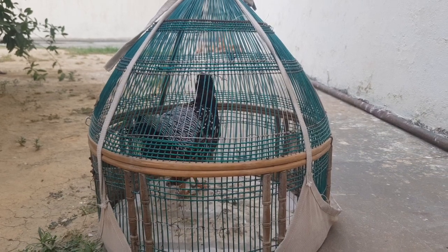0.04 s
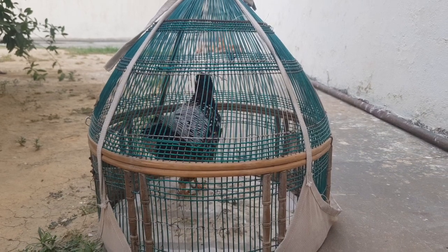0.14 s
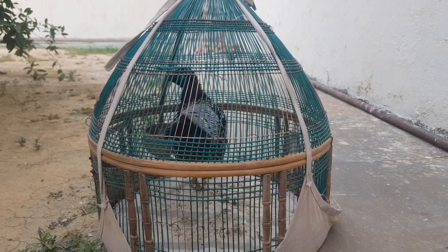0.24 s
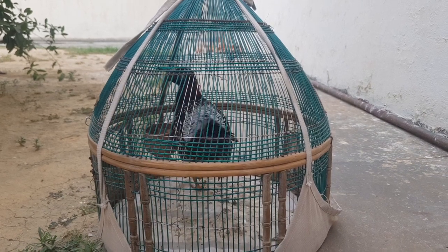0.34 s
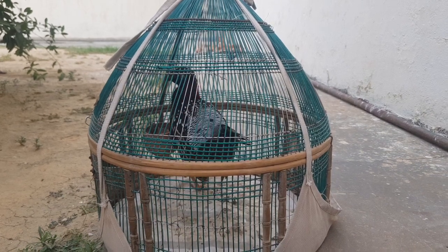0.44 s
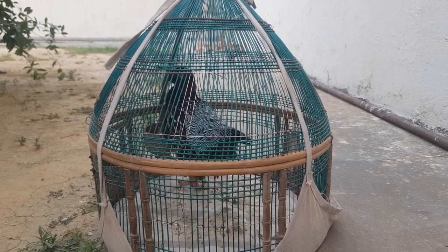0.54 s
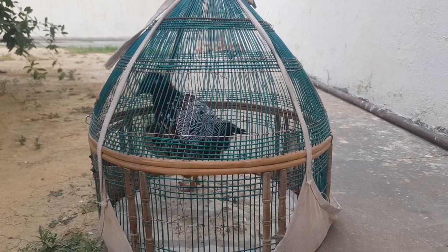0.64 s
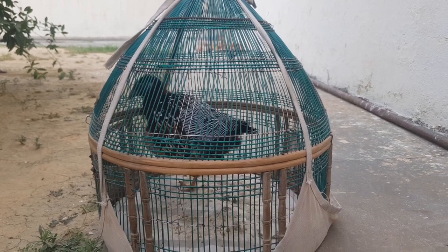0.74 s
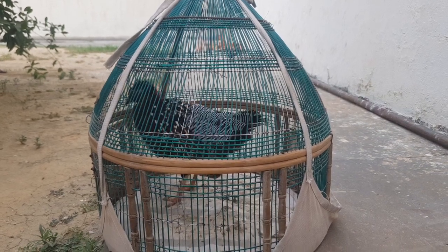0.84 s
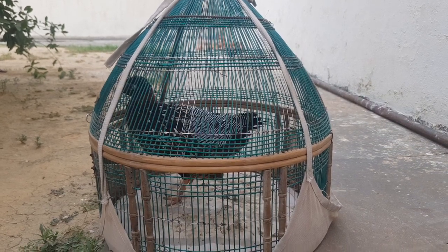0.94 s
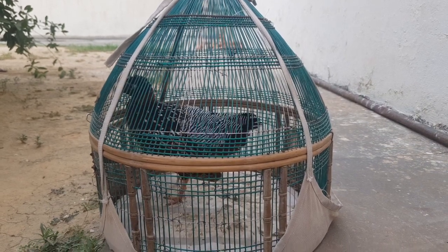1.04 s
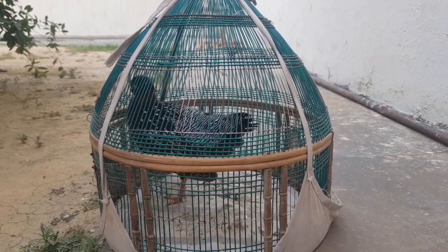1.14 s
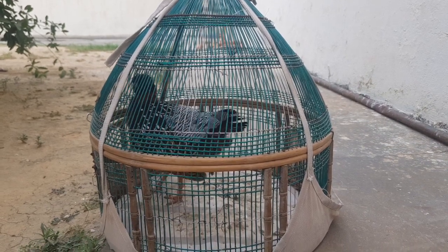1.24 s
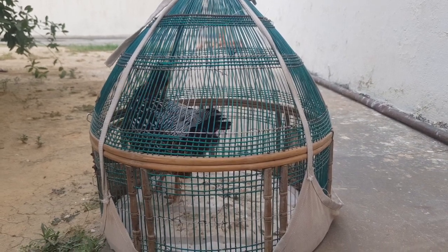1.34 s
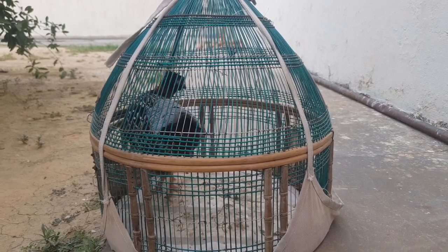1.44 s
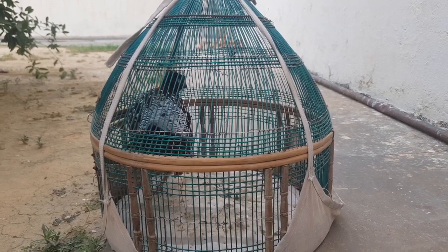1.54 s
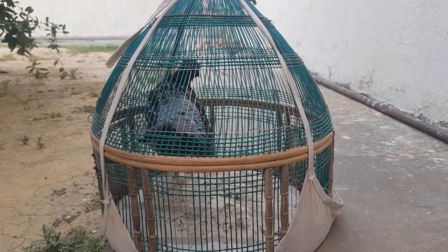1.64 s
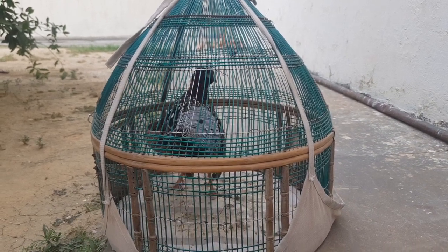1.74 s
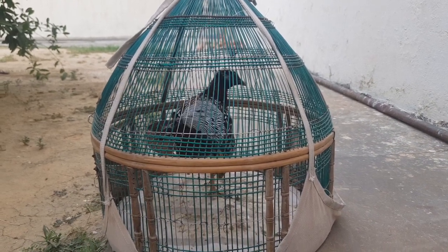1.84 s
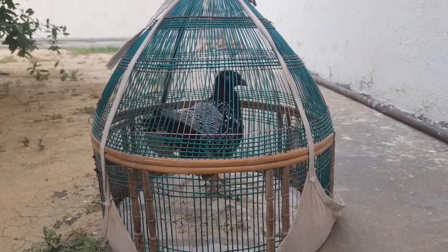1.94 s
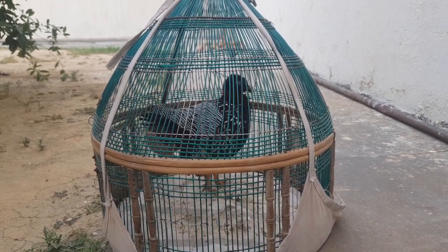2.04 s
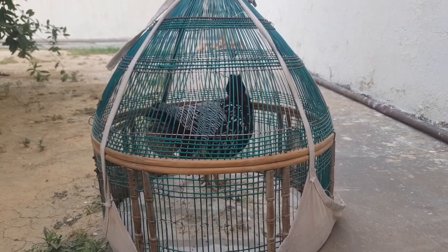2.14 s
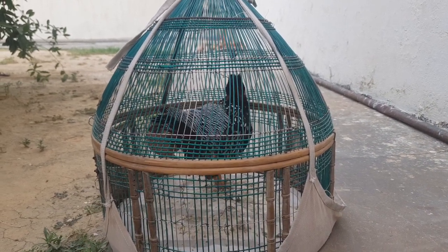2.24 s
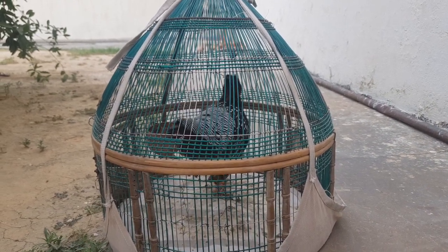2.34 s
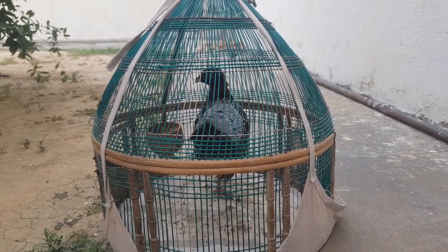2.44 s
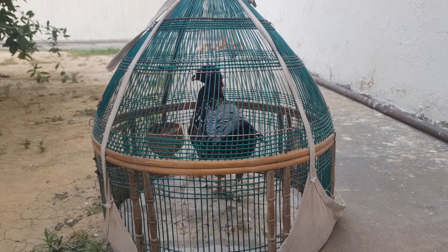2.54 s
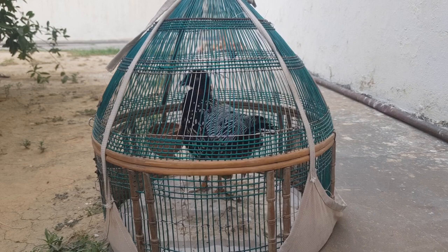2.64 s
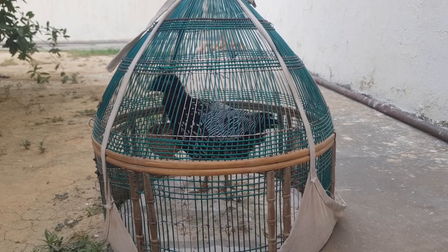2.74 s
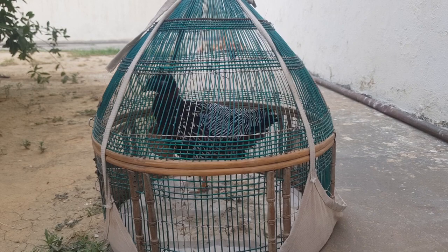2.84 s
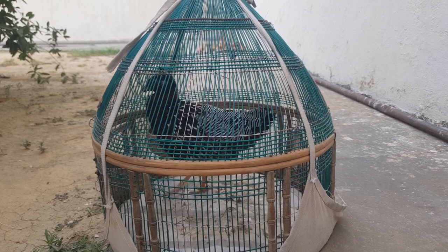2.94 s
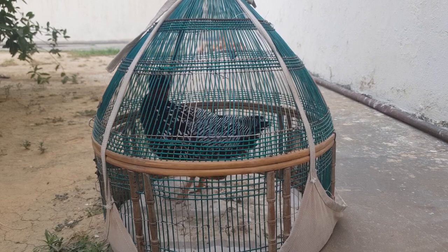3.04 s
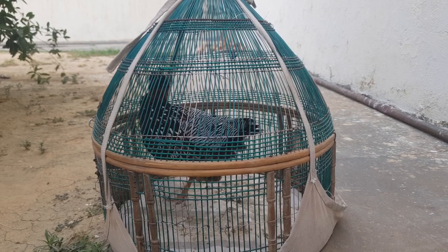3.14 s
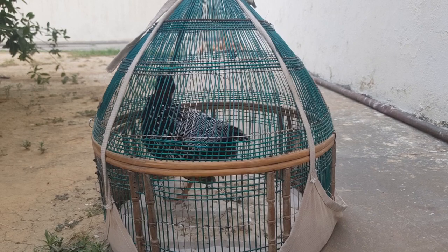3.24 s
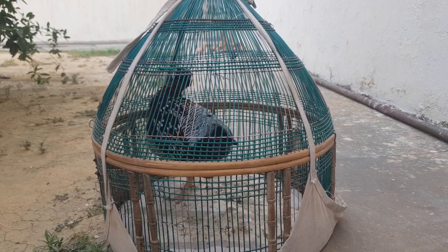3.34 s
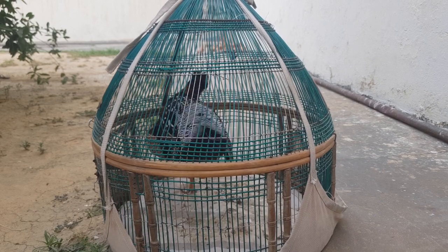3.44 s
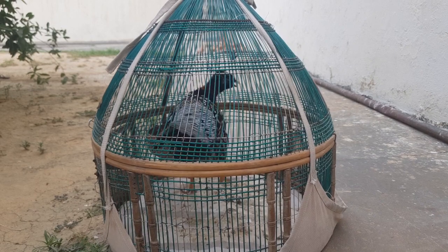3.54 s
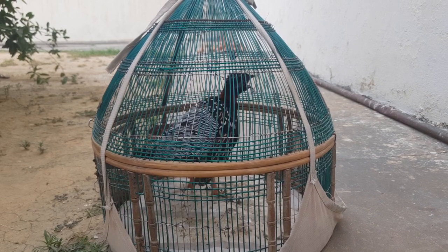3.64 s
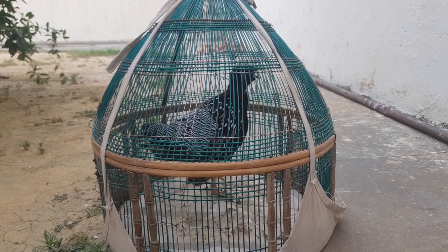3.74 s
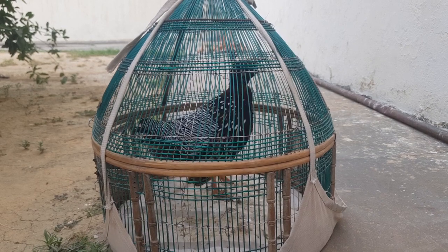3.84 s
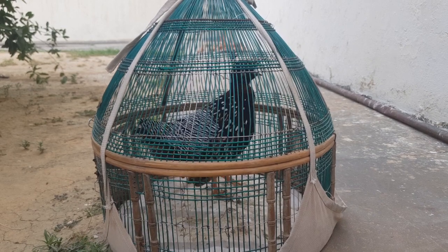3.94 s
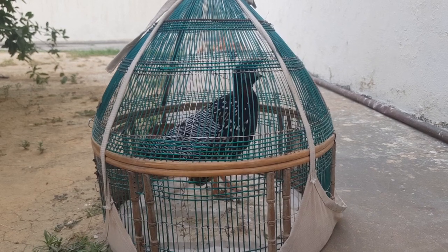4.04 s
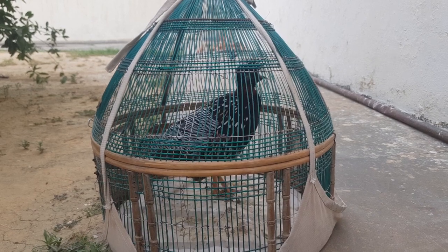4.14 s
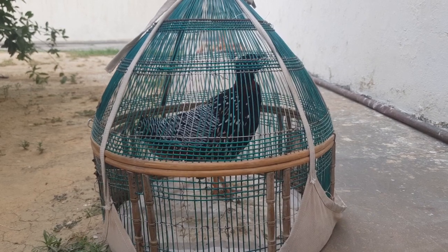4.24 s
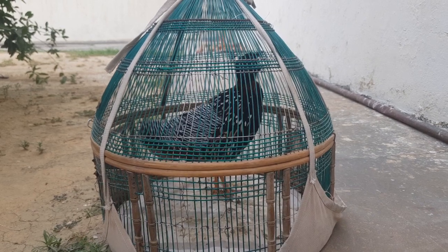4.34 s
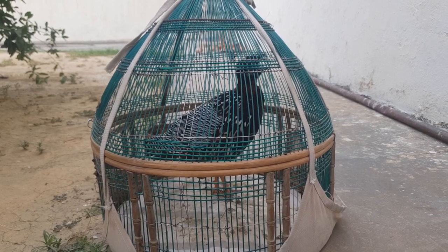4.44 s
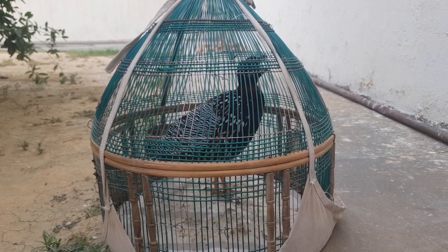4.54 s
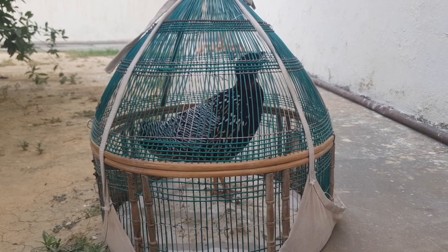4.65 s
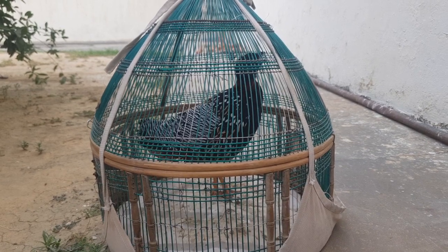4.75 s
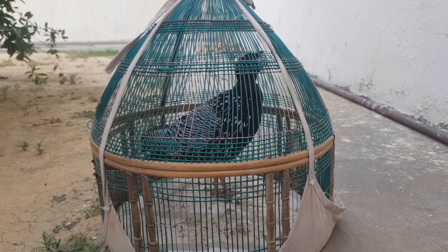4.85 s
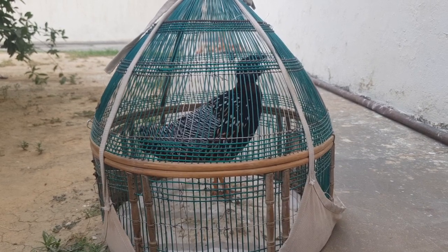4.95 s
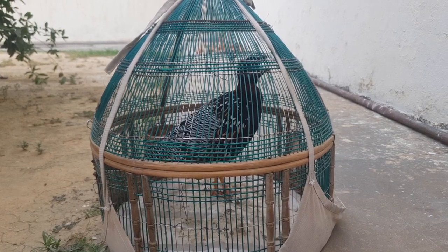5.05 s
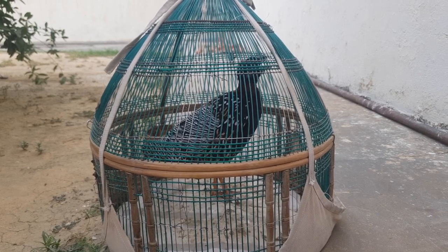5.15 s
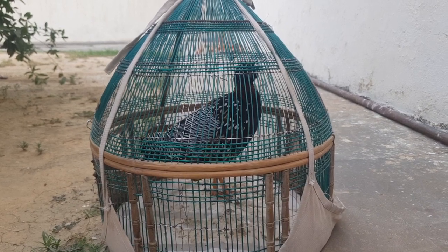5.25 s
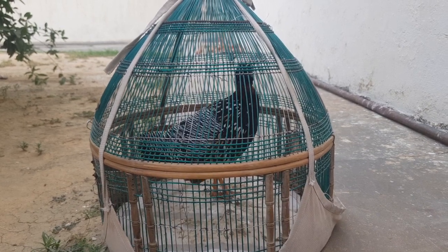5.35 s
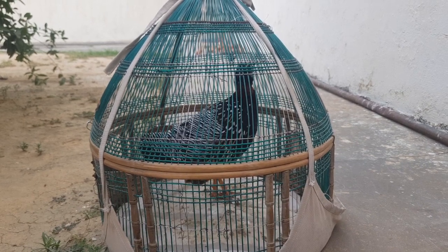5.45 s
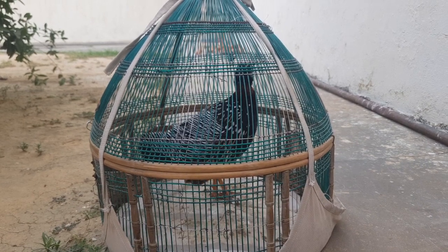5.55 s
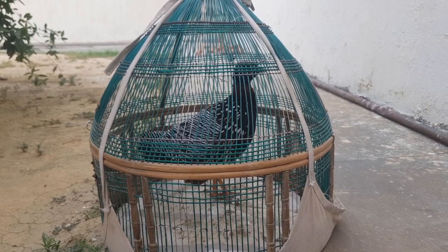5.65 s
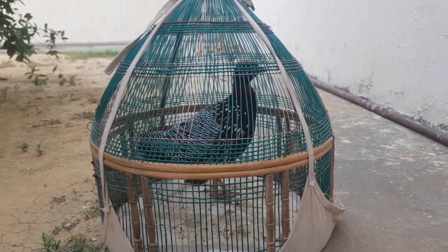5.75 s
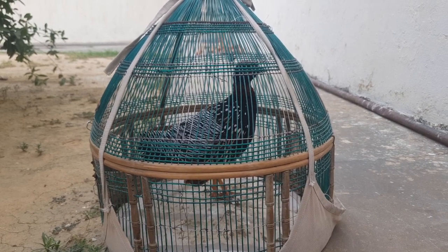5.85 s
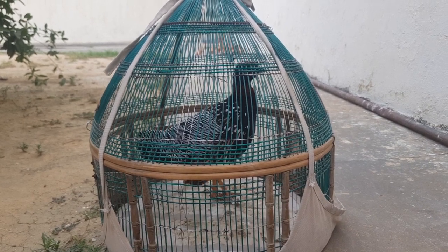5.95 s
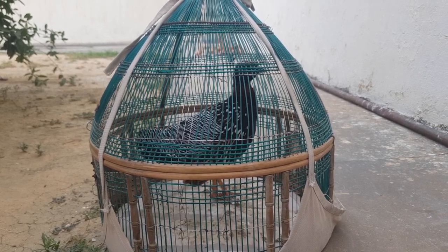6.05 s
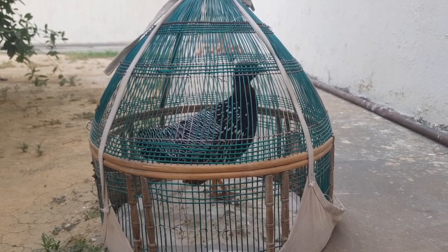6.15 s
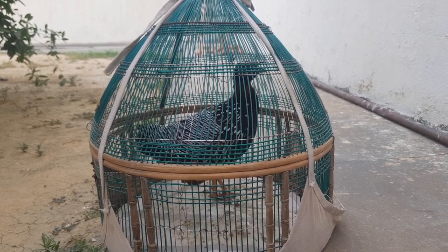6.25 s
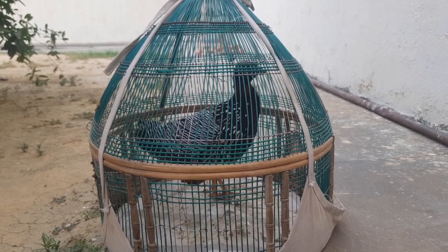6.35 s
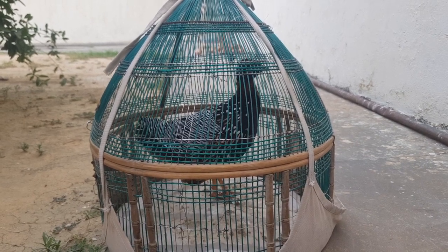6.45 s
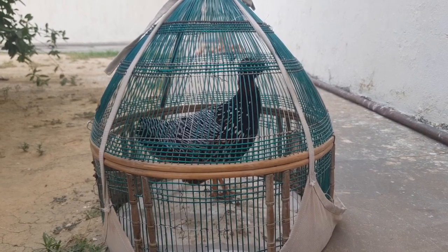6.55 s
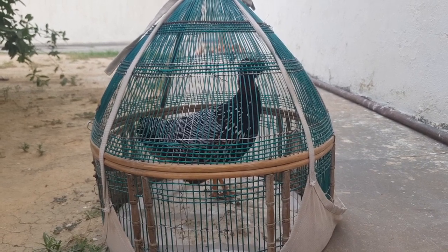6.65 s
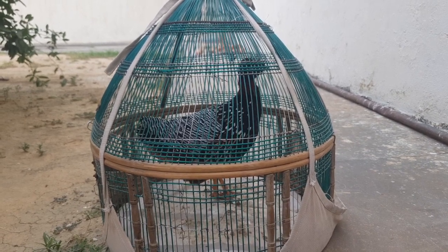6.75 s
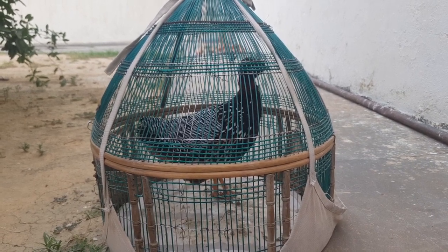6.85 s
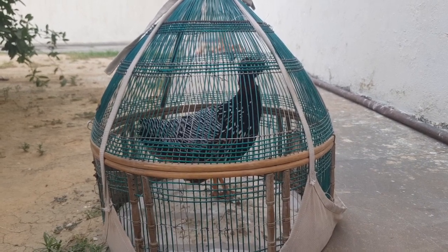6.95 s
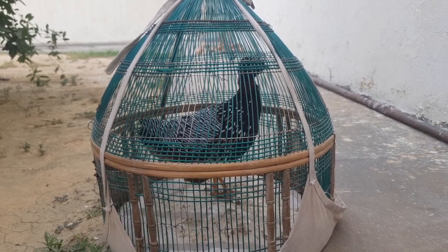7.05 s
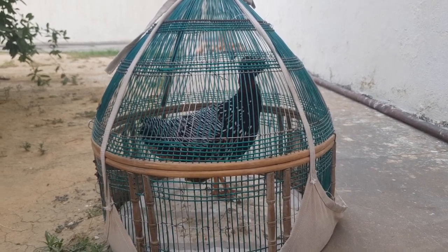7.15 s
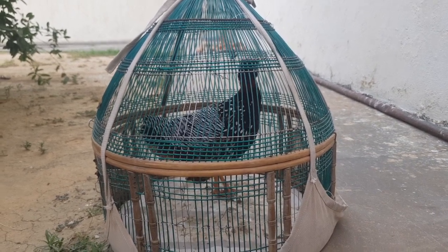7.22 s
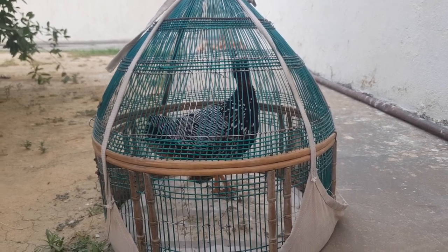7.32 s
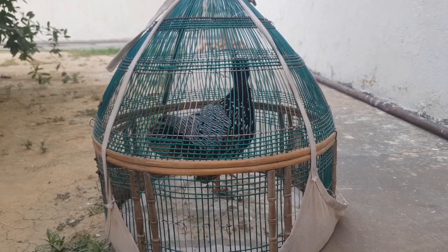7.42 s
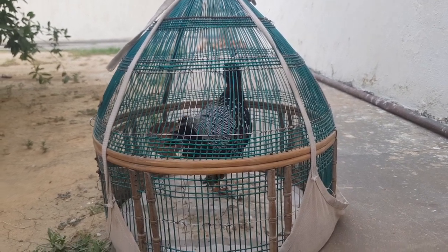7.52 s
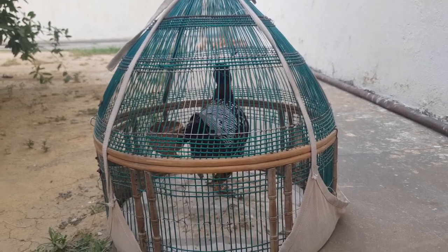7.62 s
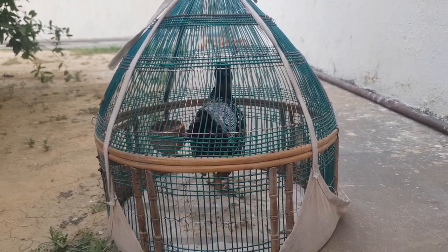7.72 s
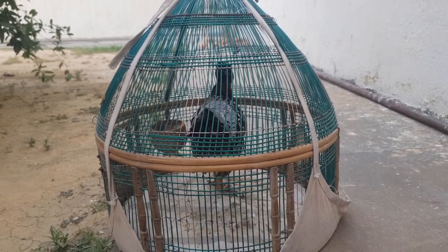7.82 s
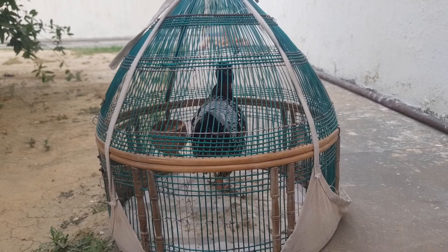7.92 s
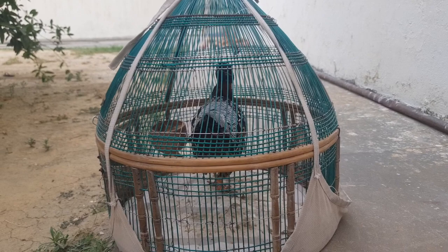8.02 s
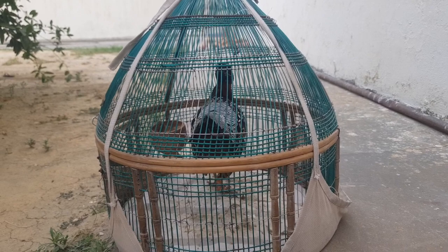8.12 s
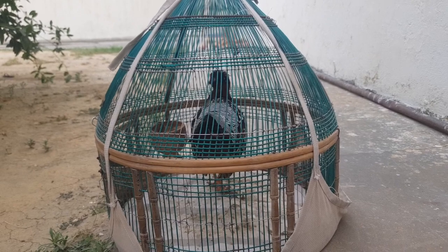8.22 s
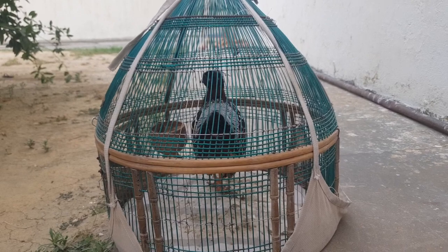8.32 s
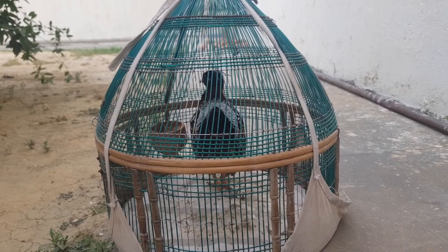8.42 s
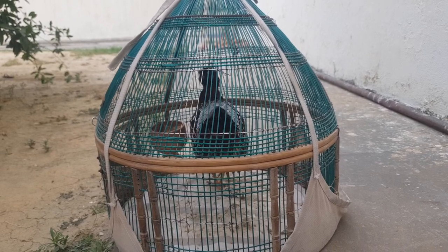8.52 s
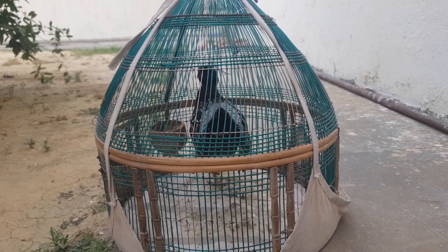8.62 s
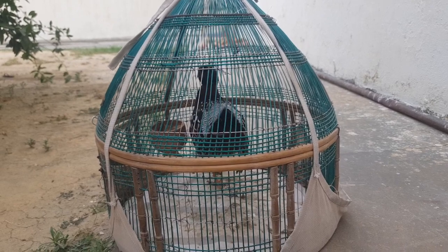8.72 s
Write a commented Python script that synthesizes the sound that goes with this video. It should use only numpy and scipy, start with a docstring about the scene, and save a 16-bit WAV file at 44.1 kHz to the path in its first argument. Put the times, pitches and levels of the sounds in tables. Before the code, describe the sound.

Small foot ticks on a wire cage, then a sudden piercing, raspy partridge-like call, a soft whistle, and quiet outdoor hum with far chirps.

```python
"""Caged francolin calling

A francolin shuffles in a wire cage, gives a short squealing cluck, four loud grating syllables (two break
into a squeal) and a soft whistle. Rasps are slaps and puffs ringing the throat; squeals are nearly pure tones.
Gliding notes make far birds, shaped noise a low rumble, and wavering sines a distant motor hum.
The recorder's gain control drops with the call, holds, then recovers; a limiter catches peaks."""
import sys
import numpy as np
from scipy import signal
from scipy.fft import rfft, irfft
from scipy.io import wavfile
from scipy.ndimage import uniform_filter1d, minimum_filter1d

SR = 44100
rng = np.random.default_rng(int(sys.argv[2]) if len(sys.argv) > 2 else 0)


def master_out(mix):
    """Clip the mix to full scale and print it as 16-bit PCM to the path in sys.argv[1]."""
    frames = np.transpose(np.atleast_2d(mix))
    ceiling = np.clip(frames, -1, 1)
    pcm = np.round(ceiling * 32767).astype(np.int16)
    wavfile.write(sys.argv[1], SR, pcm)


N = 387198
TIME = np.arange(N) / SR


def gain_of(db):
    """Decibels to amplitude."""
    return 10 ** (np.asarray(db) / 20)


def evened(x):
    """Scales to an rms of one."""
    return x / np.sqrt(np.mean(x ** 2) + 1e-20)


def read(points, hz):
    """A table of (Hz, value) joined by lines on a log axis."""
    f, value = np.transpose(points)
    return np.interp(np.log(hz + 1), np.log(f), value)


def add(mix, s, sound):
    """Mixes a sound in at time s."""
    part = mix[max(round(s * SR), 0):][:len(sound)]
    part += sound[:len(part)]


def wander(size, hz):
    """Slow chance of about unit rms, rolled off smoothly around hz."""
    f = np.fft.rfftfreq(size + SR // 4, 1 / SR)
    spectrum = rfft(rng.standard_normal(size + SR // 4))
    return evened(irfft(spectrum * np.exp(-(f / hz) ** 2)))[:size]


def resonate(x, hz, width_hz):
    """A steep two-stage resonance of gain one that can follow a curve."""
    turn = np.exp(2j * np.pi * np.cumsum(hz * np.ones(len(x))) / SR)
    r = np.exp(-np.pi * abs(width_hz) / SR)
    shifted_down = signal.lfilter([(1 - r) ** 2], [1, -2 * r, r * r], x / turn)
    return 2 * (turn * shifted_down).real


def ramp(x):
    """One at zero, easing down to nothing at one."""
    return np.clip(1 - x, 0, 1) ** 0.72


# Syllables. Each row: start in seconds, length in seconds, effort in dB, attack in seconds, release in
# seconds, brightness in dB per octave, factor on throat resonances, pulse rate in Hz, roughness 0-1.
SYLLABLES = [ (3.576, 0.034, -16.5, 0.0078, 0.017, 8.5, 0.56, 300.4, 0.65),
             (3.615, .041, 1, 0.011, 0.0041, 1.5, .98, 285, 0.4),
             (3.657, .018, -14, 0.0053, 0.0098, 3, .98, 281, .7),
             (3.971, 0.17, 8.5, 0.014, 0.027, -2.5, 1.015, 284, 0.3),
             (4.326, .228, 5, 0.03, 0.02, -1, .985, 265, .3),
             (4.803, 0.092, 6, 0.033, 0.023, -1.5, 1, 261.1, .48),
             (4.949, .180, 4.5, 0.023, 0.021, -0.5, 1.012, 262.6, 0.52)]
# Throat and beak resonances. Each row: centre in Hz, width in Hz, level in dB.
THROAT = [(1916, 130, -29), (2450, 100, -20), (3357, 290, 6), (3926, 490, 1), (4950, 500, -1),
          (5460, 790, -10), (7404, 860, -18), (9250, 3300, -19), (11760, 6300, -26.5), (13700, 5400, -23.5)]
# Low noise under the call: centre in Hz, width in Hz, level in dB.
LOW_NOISE = (280, 130, -49)
# Low croak where effort is slack: centre at full effort in Hz, width in Hz, level in dB.
CROAK = (2484, 420, -12)
CROAK_DROP_HZ_PER_DB = 33.5
ONSET_DB, END_DB, TIRING_DB_PER_S = -18, -19, -13.5  # effort at the two ends, sag in between
DULLING_PER_OCTAVE = 0.17  # dB lost per dB of slack
OPENING_DB_PER_OCTAVE = 7.5  # gained over a syllable as the beak opens
PULSE_SAG_SHARE, THROAT_RISE_SHARE, THROAT_QUIVER_SHARE = .015, .04, .015
RASP_DUCK_DB = -19.5  # during a squeal


def rasp(start, length, top_db, attack_s, release_s, bright, throat, pulse_hz, rough, puff_turns=.5,
         leak=0.24, uneven=0.25, sweep=.037, slack_drop=.011, air_db=-44, air_hz=550,
         air_width_hz=1200, low_follow=.5):
    """The syrinx slaps and lets out a puff at each slap; the throat rings with both."""
    t = np.arange(0, length, 1 / SR)
    past_middle = t / length - .5
    slack_db = ONSET_DB * ramp(t / attack_s) + END_DB * ramp((length - t) / release_s)
    effort_db = top_db + slack_db + TIRING_DB_PER_S * length * past_middle
    effort_db += RASP_DUCK_DB * squealing(start + t)
    bright_db = bright + DULLING_PER_OCTAVE * slack_db + OPENING_DB_PER_OCTAVE * past_middle

    rate_hz = pulse_hz * (1 - PULSE_SAG_SHARE * past_middle) * (1 + .012 * wander(len(t), 120))
    turns = np.cumsum(rate_hz) / SR
    k = np.arange(1, SR // (2 * pulse_hz) - 2)[:, None]
    # each slap sweeps quickly from high to low
    slaps = np.cos(2 * np.pi * k * turns + np.pi * sweep * k ** 2).sum(0)
    slaps = slaps * (1 + uneven * wander(len(t), 260))
    puffs = (leak + np.exp(-(turns % 1) / puff_turns)) * rng.standard_normal(len(t))
    drive = np.sqrt(1 - rough) * evened(slaps) + np.sqrt(rough) * evened(puffs)

    voice = 0
    shape = throat * (1 + THROAT_RISE_SHARE * past_middle + THROAT_QUIVER_SHARE * wander(len(t), 60))
    for hz, width_hz, db in THROAT:
        octaves = np.log2(min(hz, 5600) / 3300)  # the opening beak favours the upper resonances
        push, droop = drive, 1
        if hz <= 2800:  # weak low resonances catch only air, and droop as effort slackens
            push, droop = evened(puffs), 1.5 + slack_drop * slack_db
        voice = voice + gain_of(db + bright_db * octaves) * resonate(push, hz * shape * droop, width_hz)
    # air pressure, not chance, sets the strength from one slap to the next
    voice /= np.sqrt(abs(uniform_filter1d(voice ** 2, size=110)) + 1e-12)
    # so small a beak hardly radiates below its lowest resonance
    voice = signal.sosfilt(signal.butter(8, 1650, "highpass", fs=SR, output="sos"), voice)

    croak_hz, croak_width_hz, croak_db = CROAK
    croak = evened(resonate(puffs, croak_hz + CROAK_DROP_HZ_PER_DB * slack_db, croak_width_hz))
    voice += gain_of(croak_db) * (1 - gain_of(slack_db)) * croak
    # low noise goes on through a squeal
    low_hz, low_width_hz, low_db = LOW_NOISE
    low = gain_of(air_db) * evened(resonate(puffs, air_hz, air_width_hz))
    low = low + gain_of(low_db) * evened(resonate(puffs, low_hz, low_width_hz))
    call = gain_of(effort_db) * voice + gain_of(low_follow * (top_db + slack_db)) * low
    return start, call * signal.windows.tukey(len(t), .02)


# Squeals. Each row: start in seconds, length in seconds, level in dB, top pitch in Hz,
# scoop up to it in Hz, overtone level in dB.
SQUEALS = [(3.613, 0.041, -2, 5584, 1520, -8), (4.491, .033, 4, 5698, 1373, -10.5),
           (5.018, 0.029, 3, 5633, 387, -5)]
SCOOP_S, DROOP_HZ = 0.0086, 330  # pitch scoops up, then droops at the end


def squeal(start, length, db, top_hz, scoop_hz, overtone_db, jitter=0.0026, shimmer_db=3.0, third_db=-8):
    """The syrinx locks into one fast, nearly pure vibration."""
    t = np.arange(0, length, 1 / SR)
    hz = top_hz - scoop_hz * np.exp(-(t / SCOOP_S) ** 1.3) - DROOP_HZ * (t / length) ** 4
    phase = 2 * np.pi * np.cumsum(hz * (1 + jitter * wander(len(t), 700))) / SR
    overtones = np.sin(2 * phase) + gain_of(third_db) * np.sin(3 * phase)
    tone = np.sin(phase) + gain_of(overtone_db) * overtones
    level = np.sqrt(2) * gain_of(db + shimmer_db * wander(len(t), 290))
    return start, level * tone * signal.windows.tukey(len(t), .4)


def squealing(t, switch_s=0.0076):
    """How far the syrinx is locked into a squeal at times t, 0-1."""
    return sum(np.clip(np.minimum(t - s - switch_s / 2, s + length - t) / switch_s, 0, 1)
               for s, length, *_ in SQUEALS)


WHISTLE_S, WHISTLE_LENGTH_S, WHISTLE_DB = 5.243, .165, -19.5
WHISTLE_HZ, WHISTLE_SAG_HZ_PER_S = 2473, 1300
WHISTLE_SCOOP_HZ, WHISTLE_SCOOP_S = 220, 0.021  # starts a little flat


def whistle(flutter=0.96, hiss_db=-17, hiss_hz=2500, fizz_db=-24):
    """A thin fluttering whistle that scoops up and then sags, with air hissing round it."""
    t = np.arange(0, WHISTLE_LENGTH_S, 1 / SR)
    hz = WHISTLE_HZ - WHISTLE_SAG_HZ_PER_S * t - WHISTLE_SCOOP_HZ * np.exp(-t / WHISTLE_SCOOP_S)
    flutters = 1 + flutter * (wander(len(t), 136) + 1j * wander(len(t), 120))
    tone = evened((flutters * np.exp(2j * np.pi * np.cumsum(hz) / SR)).real)
    air = rng.standard_normal(len(t))
    hiss = gain_of(hiss_db) * evened(resonate(air, hiss_hz, 3930)) + gain_of(fizz_db) * air
    return WHISTLE_S, gain_of(WHISTLE_DB) * (tone + hiss) * signal.windows.tukey(len(t), .45)


# Cane and wire resonances. Each row: centre in Hz, width in Hz, level in dB.
CAGE = [(1399, 160, 4), (2210, 690, 3), (4400, 220, -2), (6100, 2000, -16), (9477, 1000, -19)]


def scrape(size, hz, tick_db, width_share=0.44, ring_db=0):
    """Contact with the cage thuds, rings the cane frame and ticks on the wire."""
    rub, tick = rng.standard_normal((2, size))
    ring = evened(sum(gain_of(db) * resonate(tick, f, width_hz) for f, width_hz, db in CAGE))
    thud = evened(resonate(rub, hz, width_share * hz))
    return thud + gain_of(tick_db) * tick + gain_of(ring_db) * min(hz / 2000, 1) ** 2 * ring


# Feet on the cage. Each row: start in seconds, level in dB, ring in Hz, relative dry tick in dB,
# t60 in seconds.
STEPS = [(0.599, -58, 2250, 4.5, 0.11), (.805, -39, 2100, -15, 0.025), (1.585, -64, 2490, 4, 0.049),
         (1.679, -51, 1370, -31, .096), (2.315, -53.5, 1530, -35, 0.051),
         (2.967, -51.5, 1870, -11.5, 0.012), (3.242, -53, 1000, -4.5, 0.027),
         (3.353, -53.5, 2647, -5.5, 0.044), (5.664, -42.5, 493, -25.5, 0.057), (5.738, -49, 885, -7, 0.068),
         (8.563, -53, 1620, -33, 0.029)]
# Feathers brushing the cage as the bird turns. Each row: start in seconds, length in seconds,
# level in dB, relative dry tick in dB.
BRUSHES = [(0, 0.27, -86, -17.5), (0.725, 0.22, -72, -0.5), (1.489, 0.11, -78.5, 3.5),
           (1.603, 0.13, -75, 10.5)]
BRUSH_HZ, SHUFFLE_PER_S, SHUFFLE_DB = 1940, 4, -63


def steps(touch_tick_db=-8, touch_t60=0.013, grain_db=2.5):
    """Sharp footfalls, light touches at random, and grainy swells of feathers."""
    out, t = np.zeros(N), np.arange(SR // 3) / SR
    still_s = SYLLABLES[0][0]  # random touches end where the call starts
    touches = [(s, SHUFFLE_DB, BRUSH_HZ, touch_tick_db, touch_t60)
               for s in rng.uniform(0, still_s, int(still_s * SHUFFLE_PER_S))]
    for s, db, hz, tick_db, t60 in STEPS + touches:
        envelope = gain_of(db - 60 * t / t60) * (1 - np.exp(-t / .0006))
        add(out, s, scrape(len(t), hz, tick_db) * envelope)
    for s, length, db, tick_db in BRUSHES:
        size = int(length * SR)
        envelope = gain_of(db + grain_db * wander(size, 80)) * signal.windows.tukey(size, .6)
        add(out, s, scrape(size, BRUSH_HZ, tick_db) * envelope)
    return out


def note(length, start_hz, end_hz, unsteady, partials_db, taper=0.43):
    """One gliding bird note of harmonic partials."""
    size = max(int(length * SR), 64)
    hz = np.linspace(start_hz, end_hz, size) * (1 + unsteady * wander(size, 250))
    phase = 2 * np.pi * np.cumsum(hz) / SR
    tone = sum(gain_of(db) * np.sin(k * phase) for k, db in enumerate(partials_db, 1))
    return evened(tone) * signal.windows.tukey(size, taper)


# Lone chirps. Each row: start in seconds, length in seconds, start pitch in Hz, end pitch in Hz, level in dB.
CHIRPS = [(2.07, 0.22, 2670, 2780, -79.5), (3.2, .044, 3866, 3881, -53), (3.766, 0.086, 2490, 2408, -47),
          (5.741, 0.046, 2876, 3135, -63), (7.505, .045, 2298, 1705, -59.5), (8.1, .012, 7580, 6700, -63),
          (8.48, 0.06, 3180, 3215, -72)]
# Song in the trees, two pips and a falling slur. Each row: offset in seconds, length in seconds,
# start pitch in Hz, end pitch in Hz, level in dB relative to the phrase.
SONG = [(0, .022, 3565, 3378, -10), (0.027, 0.02, 3365, 3240, -1.5), (0.049, .075, 2750, 2330, 1)]
# Song phrases. Each row: start in seconds, level in dB.
PHRASES = [(3.212, -51.5), (6.842, -44), (7.385, -45)]
# Long far cries. Each row: start in seconds, length in seconds, start fundamental in Hz,
# end fundamental in Hz, level in dB, pitch unsteadiness as a share.
CRIES = [(2.261, 0.3, 960.4, 942.6, -50, 0.01), (2.483, 0.14, 927, 853, -53, 0.082),
         (5.951, 0.25, 951.5, 937, -54.5, 0.042), (6.082, .26, 963, 863, -56, 0.058),
         (6.738, 0.17, 884, 896, -47, 0.1393), (7.393, 0.31, 2758, 3083, -67, .09)]


def far_birds():
    """Song phrases, lone chirps, and long swelling cries whose second harmonic leads."""
    out, notes = np.zeros(N), list(CHIRPS)
    for start, phrase_db in PHRASES:
        for s, length, start_hz, end_hz, db in SONG:
            notes.append((start + s, length, start_hz, end_hz, phrase_db + db))
    for s, length, start_hz, end_hz, db in notes:
        add(out, s, gain_of(db) * note(length, start_hz, end_hz, unsteady=.035, partials_db=[0, -21]))
    for s, length, start_hz, end_hz, db, unsteady in CRIES:
        cry = note(length, start_hz, end_hz, unsteady, partials_db=[-12, 0], taper=0.91)
        add(out, s, gain_of(db) * cry)
    return out


# Left port response, facing away. Each row: frequency in Hz, level in dB.
LEFT_PORT = [(100, 4.5), (1200, -15), (2000, -1.5), (3300, -12.5), (5500, -13), (7500, -11), (9200, -2),
             (11000, -4.5), (13000, -10.5), (15500, -13)]
# Left port phase lead. Each row: frequency in Hz, lead in radians.
LEFT_TURN = [(1200, 0), (2000, -1.3), (3300, .8), (5300, -1), (9200, 1.3), (13000, 1.6)]


def near(x):
    """Straight path plus a bounce off the paving, as each microphone port hears them."""
    hz = np.fft.rfftfreq(N, 1 / SR)
    left_s, right_s, bounce = .00254, .00186, .36
    left = 1 + bounce * np.exp(-2j * np.pi * hz * left_s)
    left = left * gain_of(read(LEFT_PORT, hz)) * np.exp(1j * read(LEFT_TURN, hz))
    right = 1 + bounce * np.exp(-2j * np.pi * hz * right_s)
    return irfft(rfft(x) * np.array([left, right]), N)


# Yard decay. Each row: frequency in Hz, t60 in seconds.
YARD_RING = [(300, 0.17), (1500, 0.6), (3000, 0.66), (5500, 0.52), (9000, 0.22), (15000, 0.56)]


def walls(x, left_db=-4, early_db=7, early_s=0.051):
    """Scattered yard echoes: strong early ones, then a tail that decays by frequency."""
    taps = rng.standard_normal((2, SR)) * (rng.random((2, SR)) < 3000 / SR) * (TIME[:SR] > .005)
    hz, t, z = signal.stft(taps, SR, nperseg=256)
    fade_db = -60 * t / read(YARD_RING, hz)[:, None] + early_db * np.exp(-t / early_s)
    tail = signal.istft(z * gain_of(fade_db), SR, nperseg=256)[1]
    tail *= gain_of([[left_db], [0]]) / np.linalg.norm(tail, axis=1, keepdims=True)
    return signal.fftconvolve(x[None], tail, axes=1)[:, :N]


# Rumble spectrum. Each row: frequency in Hz, relative density in dB per Hz.
YARD = [(13, -40.5), (22, -20.5), (52, 2.5), (70, 0.5), (179, -16.5), (278, -20.5), (432, -33.5),
        (510, -35), (1130, -46), (1970, -43), (3510, -48), (4380, -51), (8030, -60), (12500, -51),
        (16000, -54)]
# Rumble level. Each row: time in seconds, level in dB.
YARD_DB = [(0, -49), (2, -47.5), (3, -44.5), (8.78, -45.5)]
# Rumble left-right likeness. Each row: frequency in Hz, likeness 0-1.
YARD_SAME = [(60, 0.99), (180, 0.89), (550, 0.46), (1650, 0.07), (4970, 0.03), (15000, 0.01)]
# Distant motor drawing nearer. Each row: time in seconds, level in dB.
MOTOR = [(0, -64), (2.8, -62.5), (6, -59), (7.4, -47.5), (8.78, -47)]
MOTOR_HZ, YARD_SWELL_DB = 120.8, .5  # mean firing rate, random swell


def background(left_db=-2.0, right_db=0.1):
    """Low outdoor rumble with a trace of hiss, and a wavering motor hum."""
    hz = np.fft.rfftfreq(N, 1 / SR)
    a, b = rfft(rng.standard_normal((2, N))) * gain_of(read(YARD, hz))
    same = np.clip(read(YARD_SAME, hz), 0, 1)
    rumble = evened(irfft(np.array([a, same * a + np.sqrt(1 - same ** 2) * b]), N))
    rumble *= gain_of(np.interp(TIME, *np.transpose(YARD_DB)) + YARD_SWELL_DB * wander(N, 6))
    phase = 2 * np.pi * np.cumsum(MOTOR_HZ * (1 + .03 * wander(N, 10))) / SR
    hum = np.sin(phase) + gain_of(-2.0) * np.sin(phase / 2)
    hum += gain_of(-19.5) * np.sin(2 * phase) + gain_of(-15.5) * np.sin(5 * phase / 2)
    hum_db = np.interp(TIME, *np.transpose(MOTOR)) + 4.0 * wander(N, 61)
    return (rumble + evened(hum) * gain_of(hum_db)) * gain_of([[left_db], [right_db]])


# Colour of the call as it reaches the walls. Each row: frequency in Hz, level in dB.
THROWN = [(1500, -3.5), (2500, 2), (3400, -6), (4200, -2), (5000, 0), (5800, 2), (7500, 2), (11000, 4.5),
          (15000, -5)]
WALL_ECHO_S, WALL_ECHO_DB = 0.031, -30.5  # one echo from the house wall


def scene():
    """The near bird is dry and to the right; the far ones are mostly echo."""
    yard, bird, far, cage = background(), np.zeros(N), far_birds(), steps()
    for row in SYLLABLES:
        add(bird, *rasp(*row))
    for row in SQUEALS:
        add(bird, *squeal(*row))
    add(bird, *whistle())
    # stirring air and leaves smear the pitch of whatever travels far
    smear_s = .00008
    thrown, far = (np.interp(TIME + smear_s * wander(N, 98), TIME, x) for x in (bird, far))
    thrown = irfft(rfft(thrown) * gain_of(read(THROWN, np.fft.rfftfreq(N, 1 / SR))), N)
    echo = gain_of(WALL_ECHO_DB) * np.interp(TIME - WALL_ECHO_S, TIME, thrown)
    francolin = gain_of(1) * near(bird) + gain_of(-19.5) * walls(thrown) + echo
    feet = cage * gain_of([[-1], [2]]) + gain_of(-4) * walls(cage)
    trees = far * gain_of([[-9], [-5]]) + walls(far, left_db=-7.5, early_db=2.0)
    return francolin + feet + trees + yard


EDGE_HZ = 15950


def record(dry, recover_db_per_s=13, hold_s=2.154, threshold_db=-7.2):
    """Gain control drops at once, holds and recovers; a fast limiter and a band limit follow."""
    power = abs(uniform_filter1d(dry ** 2, size=600, axis=1)).max(0)
    over_db = np.maximum(10 * np.log10(power + 1e-12) - threshold_db, 0)
    half = int(hold_s * SR / 2)
    held_db = -minimum_filter1d(-over_db, 2 * half + 1, origin=half, mode="constant")
    recovered_db = recover_db_per_s * TIME
    cut_db = np.maximum.accumulate(held_db + recovered_db) - recovered_db
    out = dry / gain_of(uniform_filter1d(cut_db, size=100))
    peak = -minimum_filter1d(-np.maximum(abs(out), 1), size=140, axis=1)
    out = out / uniform_filter1d(peak, size=140, axis=1)
    band_limit = signal.firwin(511, EDGE_HZ, window=("kaiser", 9), fs=SR)
    return signal.oaconvolve(out, band_limit[None], "same")


dry = scene()
out = record(dry)
master_out(out)
```